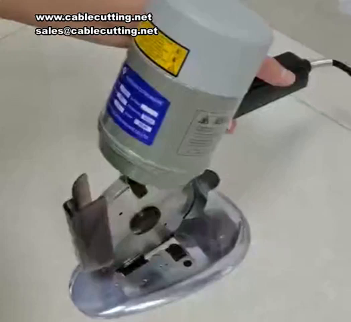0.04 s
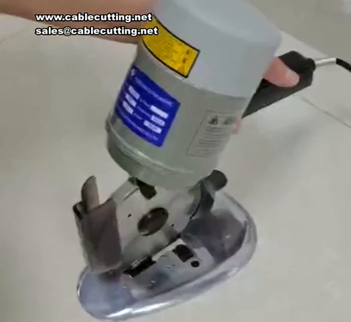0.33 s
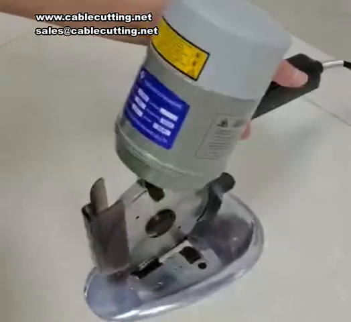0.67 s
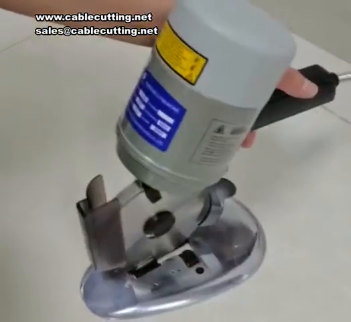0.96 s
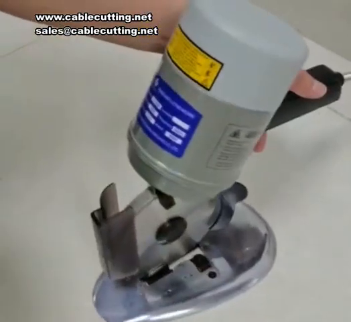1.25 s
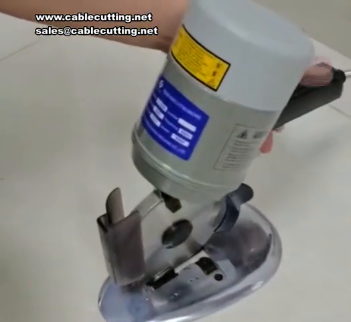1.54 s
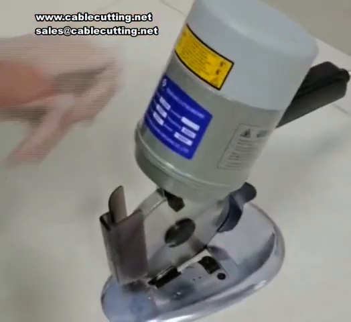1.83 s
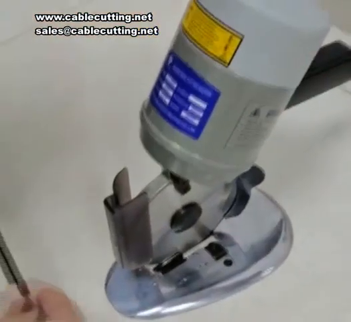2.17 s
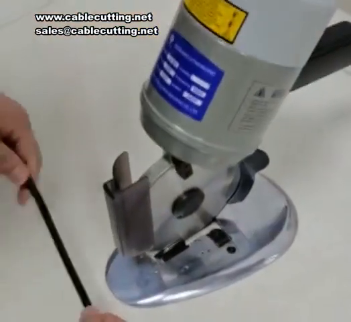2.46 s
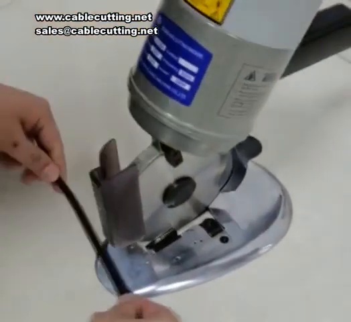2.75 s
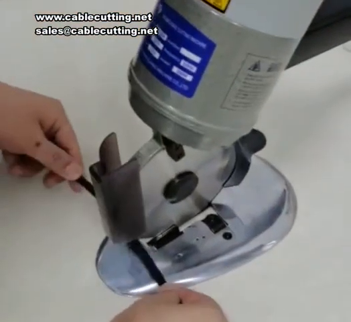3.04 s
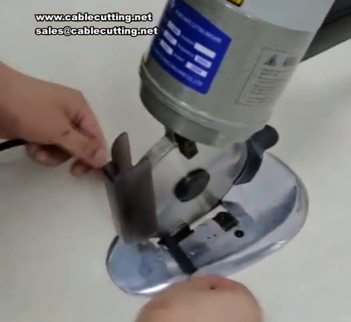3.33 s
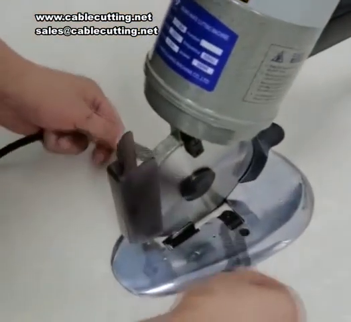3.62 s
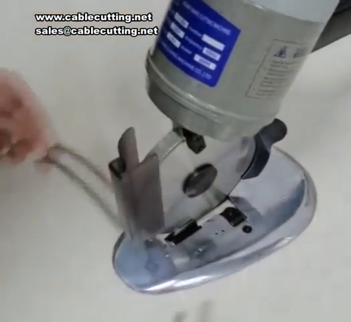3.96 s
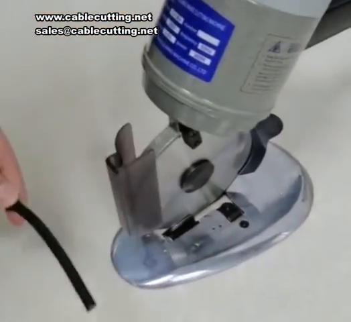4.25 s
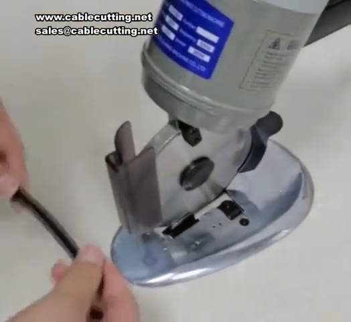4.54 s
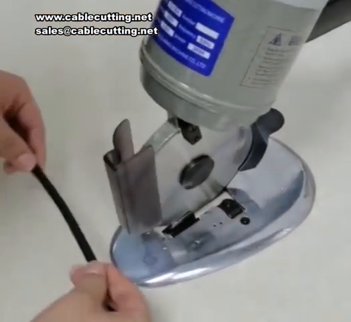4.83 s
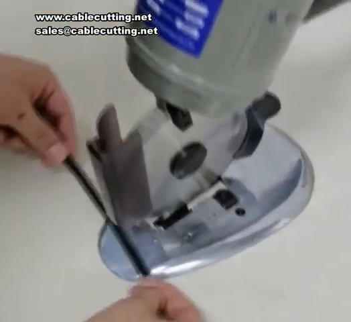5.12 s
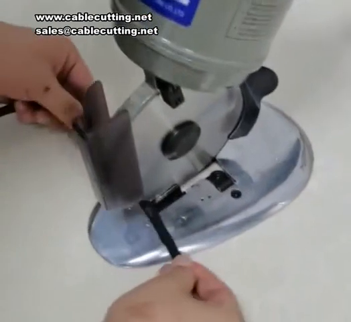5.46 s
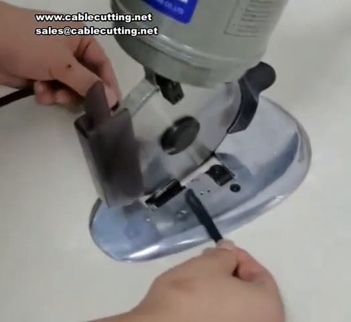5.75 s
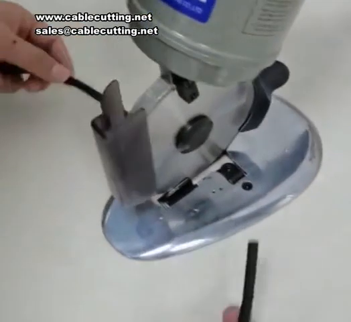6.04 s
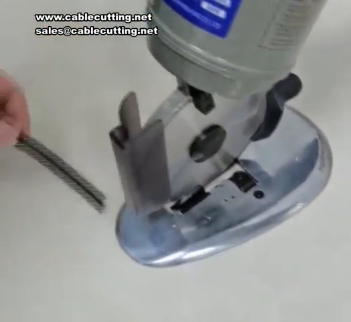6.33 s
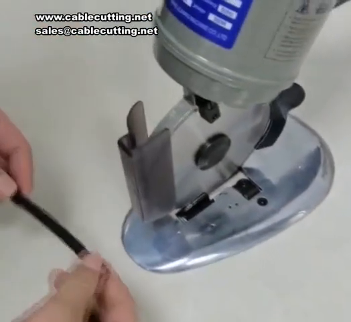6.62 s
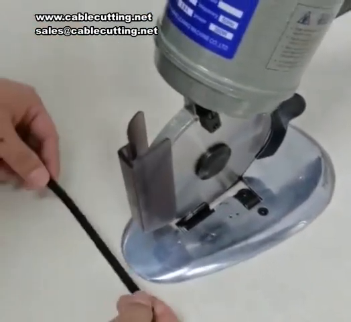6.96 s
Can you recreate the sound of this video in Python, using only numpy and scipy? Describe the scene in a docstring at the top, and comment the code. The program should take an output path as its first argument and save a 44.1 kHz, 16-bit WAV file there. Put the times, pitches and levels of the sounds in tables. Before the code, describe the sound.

Heard from close by in a workshop, a round-bladed electric cutter clicks on and whirs loudly, its several whining tones rising together until they level off. A rasping, airy hiss runs underneath. About halfway through, the blade saws through a cable with a brief crackling crunch, and a couple of seconds later it bites again, much more briefly. The pitch sags a little at each cut and recovers, and the machine runs on.

```python
"""Round-knife cutter on a cable

A hand-held cutter stands on a hard workshop floor. After a light tick its switch snaps on and the
brush motor spins up to about 250 turns a second: rotor harmonics whine over the rush of fan, gears
and brushes. Twice a cable is pushed through the blade, which rasps and slows the motor a little."""
import sys
import numpy as np
from scipy import signal
from scipy.fft import rfft, irfft, next_fast_len
from scipy.io import wavfile
from scipy.ndimage import uniform_filter1d

SR = 44100
rng = np.random.default_rng(int(sys.argv[2]) if len(sys.argv) > 2 else 0)


def file_out(sig):
    """Save sig as 16-bit WAV at sys.argv[1]."""
    # one column per channel
    cols = np.atleast_2d(sig).T
    # limit, then scale
    lim = np.clip(cols, -1, 1)
    pcm = np.round(lim * 32767).astype(np.int16)
    wavfile.write(sys.argv[1], SR, pcm)


N = 308259
T = np.arange(N) / SR
SIZE = next_fast_len(N)
HZ = np.maximum(np.fft.rfftfreq(SIZE, 1 / SR), 1)
ON_S, FULL_TURNS_PER_S, CUTOFF_HZ = 0.78, 255, 7560

# The ring of blade and guard. Each row: pitch in Hz, width in Hz, relative level in dB.
BLADE_MODES = [(900, 300, -9), (1500, 380, 1.5), (2650, 500, 0), (3600, 500, -7), (7200, 900, -13)]
# How alike the two ears sound. Each row: frequency in Hz, likeness from 0 to 1.
EAR_LIKENESS = [(40, .93), (120, .99), (230, .98), (300, .92), (390, .45), (500, .75), (650, .65),
                (800, .42), (1050, .22), (1250, .3), (1600, .1), (1800, .75), (2050, .12), (7000, .05)]
# The housing radiates unevenly. Each row: frequency in Hz, lead of the left ear in radians.
LEFT_LEAD = [(230, 0), (320, .1), (390, .7), (500, .3), (650, 1.2), (850, .6), (1050, 1.7), (1200, .5),
             (1500, .4), (1680, -2.3), (1770, -2.4), (1820, -3), (2300, -2), (7000, -1.2)]


def motor():
    """The running machine: whine, rush and blade noise come in as the switch closes."""
    speed = rotor_speed()
    press, sawing, dip_db = cutting()
    angle = 2 * np.pi * np.cumsum(speed) / SR
    powered = np.clip((T - ON_S) / 0.022, 0, 1)
    tones = whine(angle, speed, dip_db)
    noise = rush(angle, speed, press, sawing, dip_db)
    return powered * (tones + noise + strand_crunch(sawing) + blade_song(speed, sawing))


def rotor_speed():
    """The rotor gains speed quickly, then ever more slowly, and sags at each cut."""
    # Each row: time in seconds, turns per second.
    run_up = [(0.78, 22.7), (0.9, 100), (1, 126.7), (1.2, 156.5), (1.5, 184.3), (2, 209.3), (2.4, 220.5),
              (2.8, 228.1), (3.22, 232.8), (3.33, 230.5), (3.5, 231.5), (4, 239.8), (4.5, 246.1),
              (5.48, 254.1), (5.56, 252.1), (5.75, 250.9), (6.4, 255.5), (6.99, 254.2)]
    times, turns = np.transpose(run_up)
    knee_s = 0.07
    running_s = np.maximum(T - ON_S, 0)
    return np.interp(np.log(running_s + knee_s), np.log(times - ON_S + knee_s), turns)


def whine(angle, speed, dip_db):
    """Fan blades, slots and commutator bars repeat every turn, so their tones climb together."""
    share = speed / FULL_TURNS_PER_S
    # The shaft trembles in its bearings, most on the run-up, and blurs the high harmonics.
    angle = angle + .01 * drift(60) / np.maximum(share, .68) ** 4
    shake = 1 + 5.3 * (1 - share)  # more flutter at low speed
    fan = fan_tones(angle, speed, shake)
    flaring = flaring_tones(angle, speed, shake)
    faint = share ** 1.5 * faint_harmonics(angle)
    spun_up = 1 / (1 + (102 / speed) ** 10)  # hardly any whine below 102 turns a second
    rotor = fan + from_db(-.65 * dip_db) * (flaring + faint)
    return spun_up * rotor + commutator_whistle(angle, shake)


def fan_tones(angle, speed, shake):
    """Three fan harmonics lead the whine, each swelling and fading as it climbs."""
    # One level curve per harmonic. Each row: time in seconds, level in dB.
    fifth = [(0.91, -62), (1.31, -30.5), (1.51, -38), (1.71, -36), (2.11, -46), (2.41, -32), (2.51, -43.1),
             (2.61, -33), (2.71, -46), (3.11, -34), (3.41, -48), (3.61, -34.5), (4.81, -28), (4.91, -22),
             (5.41, -33), (5.61, -39), (5.71, -32.5), (6.91, -27.5)]
    sixth = [(0.91, -50), (1.01, -34), (1.71, -43.5), (1.809, -42), (2.21, -33), (2.81, -22), (2.91, -30),
             (3.11, -30), (3.21, -41), (3.51, -29.5), (3.71, -42), (4.21, -28), (5.41, -31.5),
             (5.51, -34.5), (5.71, -26.5), (6.01, -33.5), (6.31, -24.5), (6.91, -32.5)]
    seventh = [(0.91, -36), (1.31, -42), (1.81, -30.5), (2.01, -46.5), (2.21, -37), (2.51, -36.0),
               (2.61, -44), (2.81, -35.0), (3.21, -34), (3.31, -44.1), (4.21, -31.5), (4.31, -29),
               (4.71, -27), (5.41, -25.5), (5.61, -30), (6.11, -24.5), (6.21, -23.5), (6.91, -28)]
    out = np.zeros((2, N))
    for k, curve, pan_db in (5, fifth, .5), (6, sixth, 3), (7, seventh, -1):
        lead = at_hz(LEFT_LEAD, k * speed)
        partial = tone(k * angle, lead, pan_db, flutter=.22 * shake, sway=.24, swell_db=.5)
        out += from_db(in_time(curve)) * partial
    return out


def flaring_tones(angle, speed, shake):
    """Rotor tones flare as they climb through resonances, and duck at a few other pitches."""
    # Each row: multiple of rotor speed, base level at full speed in dB, change at standstill in dB,
    # left minus right in dB.
    harmonics = [(1, -48, -18, 1.5), (4, -43.5, 0, -0.5), (8, -40, -12, 1), (9, -38, -8.5, -0.5),
                 (30, -49, -10, -7.5)]
    low_hum = (1.235, -41.5, 1, 0)  # same columns; lies off the harmonic series
    # Each row: centre in Hz, width in Hz, lift in dB.
    # The last row fades the highest tone out as it climbs past the treble cut-off.
    peaks_and_dips = [(224, 37, 8), (253, 6.9, 8.5), (291.8, 29.5, 12.5), (313.4, 6.3, -7.5),
                      (848, 110, 12.5), (988, 64, -9.5), (1020, 24, 6), (1410, 120, 9.5), (1808, 13, 10.5),
                      (2074, 140, 5), (2200, 70, -5.5), (2270, 40, 4), (7440, 130, 9.5), (7500, 150, 10.5),
                      (7700, 160, -12)]
    flare_db = lift_db(peaks_and_dips, HZ)
    slowness = 1 - speed / FULL_TURNS_PER_S
    out = np.zeros((2, N))
    for k, db, slow_db, pan_db in [*harmonics, low_hum]:
        level = from_db(db + slow_db * slowness + np.interp(k * speed, HZ, flare_db))
        lead = at_hz(LEFT_LEAD, k * speed)
        sway = .24 * min(k / 4, 1)
        out += level * tone(k * angle, lead, pan_db, flutter=.22 * shake, sway=sway, swell_db=1.5)
    return out


def faint_harmonics(angle):
    """Weaker rotor harmonics shimmer across the stereo field."""
    # Each row: multiple of rotor speed, level at full speed in dB.
    harmonics = [(2, -40), (3, -41), (10, -38.5), (11, -38.5), (12, -37), (14, -39), (18, -44.5), (24, -48),
                 (25, -48), (27, -48), (29, -44), (31, -46), (32, -43)]
    out = np.zeros((2, N))
    for k, db in harmonics:
        lead = np.arccos(at_hz(EAR_LIKENESS, k * FULL_TURNS_PER_S)) * rng.choice([-1, 1])
        out += from_db(db) * tone(k * angle, lead, pan_db=0, flutter=.4, sway=.55, swell_db=4.5)
    return out


def commutator_whistle(angle, shake, bars=22):
    """The bars pass under the brushes: a high rising whistle, with side tones from uneven wear."""
    # Each row: offset from the bar rate in multiples of rotor speed, relative level in dB.
    partials = [(0, 0), (1, -13), (-1, -4.5), (-2, -8)]
    # Loudest under the starting current. Each row: time in seconds, level in dB.
    level_curve = [(.82, -58), (.88, -38), (.925, -30.5), (.97, -38), (1.01, -32), (1.12, -39), (1.3, -33),
                   (1.43, -30.5), (1.6, -35), (1.85, -32.5), (2.4, -38), (3.2, -36.5), (3.33, -52),
                   (3.6, -39), (4, -40), (4.3, -36), (5, -39.5), (5.7, -41), (6.5, -36.5)]
    out = np.zeros((2, N))
    for offset, db in partials:
        phase = (bars + offset) * angle
        out += from_db(db) * tone(phase, lead=-1.3, pan_db=-1, flutter=.25 * shake, sway=.4, swell_db=2.5)
    return from_db(in_time(level_curve)) * out


def rush(angle, speed, press, sawing, dip_db):
    """Gears and fan rumble, blade and brushes rasp, the brushes hiss; all grow with speed."""
    # The hiss swells and eases, and the rasp follows in part. Each row: time in seconds, lift in dB.
    swell_curve = [(1, -1), (1.35, -1), (1.75, 1), (2.4, -0.1), (3, 1.8), (3.6, -1.5), (4.1, 0.4),
                   (4.8, 0.7), (6.5, 1.5)]
    swell_db = in_time(swell_curve)
    share = speed / FULL_TURNS_PER_S
    rumble, rasp, hiss = housing_noise(share)
    rasp, hiss = reflections(rasp), reflections(hiss)
    rasp, hiss = worn_surface(rasp, speed, repeat=.19), worn_surface(hiss, speed, repeat=.38)
    # The brushes scrape harder once a turn, and more as the cable is pressed on.
    throb = np.cos(angle) + .5 * np.cos(2 * angle) + .5 * np.cos(3 * angle)
    flicker_db = 1.1 * drift(24)
    scrape = unit_rms(np.exp(.031 * throb)) * from_db(flicker_db + 2.5 * press - .1 * dip_db)
    sparks_db = 17 * np.exp(-np.maximum(T - ON_S, 0) / .031)  # the brushes spark at switch-on
    airflow = 1 / (1 + (72 / speed) ** 6)  # hardly any air moves below 72 turns a second
    rumble *= airflow * from_db(-22 - 21 * (1 - share) + 2.5 * press - dip_db)
    rasp *= from_db(-20 - 16 * (1 - share) + .5 * sawing + swell_db * .69 + sparks_db)
    hiss *= from_db(-32.5 - 7 * (1 - share) + 5 * sawing + swell_db + sparks_db)
    return rumble + scrape * (rasp + hiss)


def housing_noise(share):
    """Running noise coloured by the housing and split into low, middle and high bands."""
    # Broad colour. Each row: frequency in Hz, relative noise density in dB.
    colour = [(60, -29.5), (120, -13), (165, -6), (350, -6.5), (560, -4), (850, -5), (1500, 1),
              (2400, -2.5), (3450, -3), (4050, -7), (4250, -1.5), (5700, -9), (7000, -2.5), (7500, -4.5)]
    # Peaks and notches of housing and foot plate. Each row: centre in Hz, width in Hz, lift in dB.
    resonances = [(246.6, 14, 10.5), (291.6, 29, 10.5), (482, 64, 10), (625, 102, 11.5), (787, 24, 5.5),
                  (1010, 57, 3), (1123, 110, -3), (1663, 550, -4), (1850, 130, -3), (1960, 44, 6.5)]
    plain = stereo_noise() * from_db(at_hz(colour, HZ))
    housed = plain * from_db(lift_db(resonances, HZ))
    bands = (HZ < 900, (HZ >= 900) & (HZ < 4100), (HZ >= 4100) & (HZ < CUTOFF_HZ))
    low, middle, high = [waveform(housed * band) for band in bands]
    # The housing booms only once the rotor shakes it hard.
    low = share ** 2 * low + (1 - share ** 2) * waveform(plain * bands[0])
    return low, middle, high


def worn_surface(noise, speed, repeat):
    """The brushes meet the same wear again: part of their noise returns one and two turns later."""
    once, twice = [np.array([np.interp(T - turns / speed, T, ear) for ear in noise]) for turns in (1, 2)]
    return unit_rms(noise + repeat * once + repeat / 2 * twice)


def cutting(press_s=.22, gives_after_s=.02, recover_s=.1):
    """The cable is pressed on ever harder, is sawn and gives; the level dips, then recovers."""
    # Each row: start in seconds, sawing time in seconds, dip of the rumble in dB.
    cuts = [(3.238, 0.2, 5), (5.499, 0.032, 9)]
    press, sawing, dip_db = np.zeros((3, N))
    for start, length, depth_db in cuts:
        since = T - start - gives_after_s
        press += (since < 0) * np.exp(-np.abs(since) / press_s)
        sawing += (T > start) & (T < start + length)
        dip_db += (since >= 0) * depth_db * np.exp(-np.abs(since) / recover_s)
    return uniform_filter1d(np.array([press, sawing, dip_db]), size=600)


def blade_bites():
    """The blade bites into the cable and rings; the first cut also shakes the foot plate."""
    # Each row of both: start in seconds, length in seconds, level in dB.
    bites = [(3.24, .006, -10.5), (3.254, .008, -11), (3.265, .007, -9.5), (3.291, .007, -18.5),
             (3.326, .007, -18), (3.35, .016, -17), (3.397, .005, -17.5), (3.414, .017, -20),
             (5.511, .013, -14.5)]
    shudder = [(3.25, .19, -33)]
    # The plate's low boom. Its row: pitch in Hz, width in Hz, relative level in dB.
    plate_mode = [(91, 10, 0)]
    return strikes(bites, BLADE_MODES) + strikes(shudder, plate_mode)[0]


def strand_crunch(sawing, strands_per_s=350):
    """Strands snap at random while the cable is sawn; each snap rings blade and guard."""
    snaps = np.flatnonzero(rng.random(N) < sawing * strands_per_s / SR)
    sizes = from_db(.5 * np.minimum(rng.exponential(1, N)[snaps], 3))
    signs = rng.choice([-1, 1], (2, N))[:, snaps]
    push = np.zeros((2, N))
    push[:, snaps] = unit_rms(sizes * signs) * np.sqrt(SR / strands_per_s)
    return from_db(-22) * resonate(push, BLADE_MODES)


def blade_song(speed, sawing, hz=1398, width_hz=160):
    """Rubbing keeps the thin blade singing: faintly, more near 189 turns a second, most as it saws."""
    in_range = np.exp(-((speed - 189) / 36) ** 2)
    level = from_db(-41) + from_db(-33) * in_range + from_db(-28) * sawing
    return level * waveform(stereo_noise() / (1 + (2 * (HZ - hz) / width_hz) ** 2))


def tick_and_switch():
    """A light tick on the handle, then the switch contacts snap shut, both a little to the right."""
    # Each row of both: start in seconds, length in seconds, level in dB.
    tick = [(.411, 0.0031, -29.5)]
    contacts = [(.7768, 0.006, -13.5), (.796, 0.0073, -35)]
    # How they ring. Each row: pitch in Hz, width in Hz, relative level in dB.
    tick_modes = [(1830, 200, -1), (3200, 1600, 0), (6860, 900, -4)]
    switch_modes = [(1420, 120, 2), (1790, 75, 5), (2850, 200, 5), (3500, 110, 7.5), (4480, 410, -2),
                    (6270, 250, 2), (7300, 240, 4), (8350, 420, -1.5)]
    return (strikes(tick, tick_modes) + strikes(contacts, switch_modes)) * from_db([[-1.5], [1.5]])


def reflections(x, strength=.32, sway_s=.0001, count=5):
    """Echoes off floor, guard and hands ripple the spectrum; the ripples slide as the listener moves."""
    out = x.copy()
    for ear in (0, 1):
        for delay in rng.uniform(.002, .016, count):
            gain = strength * rng.choice([-1, 1])
            out[ear] += gain * np.interp(T - delay - sway_s * drift(.35), T, x[ear])
    return unit_rms(out)


def room_air():
    """The dull, gently heaving rumble of the workshop."""
    # Each row: frequency in Hz, relative noise density in dB.
    colour = [(20, -6.5), (42, -2), (54, -2.5), (66, -2.5), (100, -8.5), (230, -7), (400, -14.5),
              (800, -16.5), (1000, -11), (1150, -24), (1450, -14.5), (2200, -19.5), (3800, -26),
              (4600, -37), (7500, -37)]
    # Each row: time in seconds, relative level in dB.
    level_curve = [(0.5, -45.5), (1.7, -44.5), (2.6, -46), (2.95, -49), (3.7, -45.5), (5.1, -49),
                   (5.8, -44), (6.2, -52), (6.8, -48.5)]
    return from_db(in_time(level_curve) + 6.5) * waveform(stereo_noise() * from_db(at_hz(colour, HZ)))


def tone(angle, lead, pan_db, flutter, sway, swell_db):
    """One stereo partial: it flutters with the bearings, and sways and swells as reflections shift."""
    phase = angle + rng.uniform(0, 2 * np.pi) + flutter * drift(19)
    turn = lead / 2 + sway * drift(.83)
    lean = sway * drift(1.44)
    side = np.array([[1], [-1]])
    ears = np.cos(phase + side * turn) * (1 + side * lean) * from_db(side * pan_db / 2)
    level = (1 + flutter * drift(19.7)) * from_db(swell_db * np.tanh(drift(2.4)))
    return ears * unit_rms(level) * np.sqrt(2 / (1 + sway ** 2))


def strikes(events, modes):
    """Short bursts of rough contact ring a set of resonances, differently toward each ear."""
    push = np.zeros((2, N))
    for start, length, db in events:
        during = (T > start) & (T < start + 2 * length)
        push[:, during] += from_db(db) * np.exp(-((T[during] - start) / length) ** 4)
    return resonate(push * rng.standard_normal((2, N)), modes)


def resonate(push, modes):
    """Ring a set of resonances, keeping the power of the push."""
    total = np.sqrt(sum(from_db(db) ** 2 for _, _, db in modes))
    body = 0
    for k, (hz, width, db) in enumerate(modes):
        r = np.exp(-np.pi * width / SR)
        ring = signal.lfilter([1, 0, -1], [1, -2 * r * np.cos(2 * np.pi * hz / SR), r * r], push + 1e-18)
        body += (-1) ** k * from_db(db) / total * np.sqrt((1 - r * r) / 2) * ring
    return body


def stereo_noise():
    """Spectrum of white noise, centred in the bass and wide in the treble."""
    # Each row: frequency in Hz, left minus right in dB.
    balance = [(100, 0), (350, -.4), (450, 2), (630, -1.5), (780, 1.2), (950, -.4), (1500, .6),
               (2600, -1.3), (4000, .3), (7000, -2)]
    mid, side = rfft(rng.standard_normal((2, SIZE)))
    alike = at_hz(EAR_LIKENESS, HZ)
    ears = np.sqrt(1 + alike) * mid + np.sqrt(1 - alike) * np.array([side, -side])
    left = from_db(at_hz(balance, HZ) / 2) * np.exp(.5j * at_hz(LEFT_LEAD, HZ))
    return ears * np.array([left, 1 / left])


def drift(hz, hop=100):
    """Smooth random wander of spread 1."""
    r = np.exp(-2 * np.pi * hz * hop / SR)
    noise = rng.standard_normal(N // hop + 1002)
    slow = unit_rms(signal.lfilter([1], [1, -2 * r, r * r], noise)[1000:])
    return (slow[:-1, None] + np.diff(slow)[:, None] * np.arange(hop) / hop).ravel()[:N]


def lift_db(peaks_and_dips, hz):
    """Summed lift of a set of peaks and dips at the given frequencies."""
    return sum(db / (1 + (2 * (hz - centre) / width) ** 2) for centre, width, db in peaks_and_dips)


def low_pass(x, hz):
    """Very steep treble cut."""
    return signal.sosfilt(signal.ellip(12, .1, 80, hz, fs=SR, output="sos"), x)


def waveform(spectrum):
    """Turn a stereo spectrum into sound at unit rms."""
    return unit_rms(irfft(spectrum)[:, :N])


def in_time(curve):
    """Read a time curve at every sample."""
    return np.interp(T, *np.transpose(curve))


def at_hz(curve, hz):
    """Read a curve on a log-frequency axis."""
    points_hz, values = np.transpose(curve)
    return np.interp(np.log(hz), np.log(points_hz), values)


def from_db(db):
    """Decibels to gain."""
    return np.exp(np.asarray(db) * (np.log(10) / 20))


def unit_rms(x):
    """Scale to unit rms."""
    return x / np.sqrt(np.mean(x ** 2) + 1e-20)


def scene():
    """Cuts, motor and room; only the tick and the switch reach a little higher in the treble."""
    running = blade_bites() + motor() + room_air()
    return low_pass(running, CUTOFF_HZ) + tick_and_switch()


def record(dry):
    """The sound fades in quickly out of silence, the highest peaks are rounded and the top is cut."""
    opens_s, fade_s = .349, .042
    opened = dry * np.clip((T - opens_s) / fade_s, 0, 1)
    rounded = opened / (1 + (opened / .85) ** 8) ** (1 / 8)
    return low_pass(rounded, hz=8400)


dry = scene()
out = record(dry)
file_out(out)
```